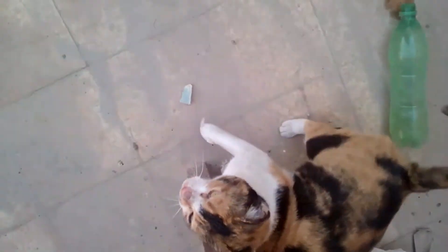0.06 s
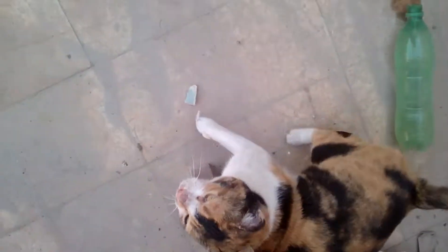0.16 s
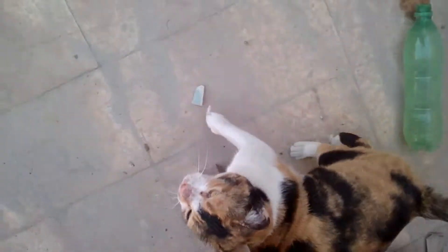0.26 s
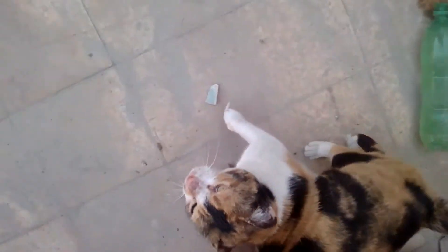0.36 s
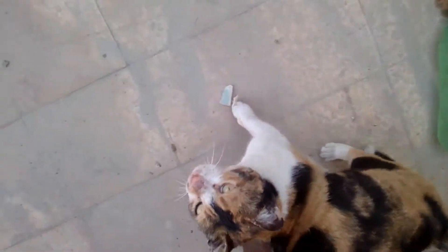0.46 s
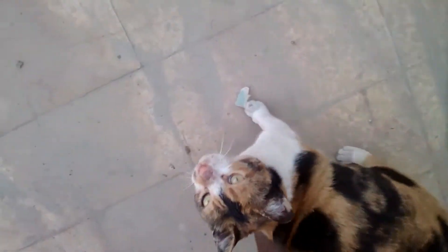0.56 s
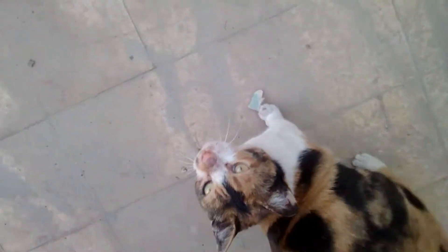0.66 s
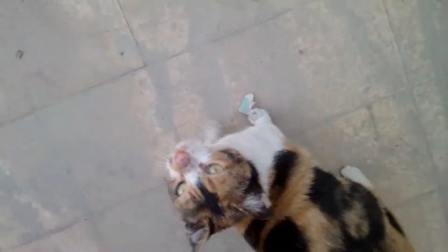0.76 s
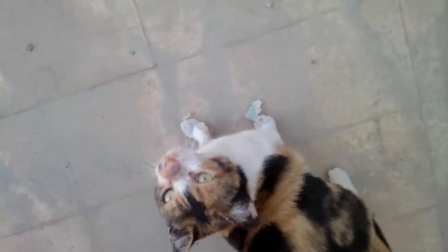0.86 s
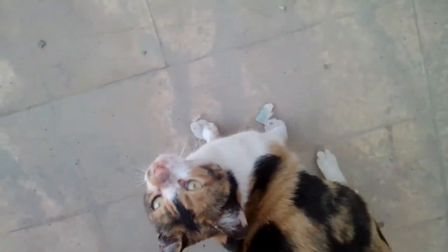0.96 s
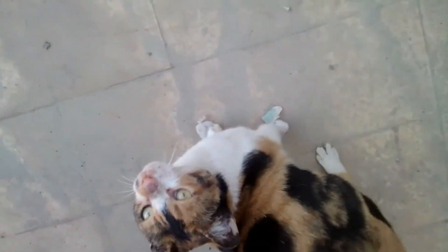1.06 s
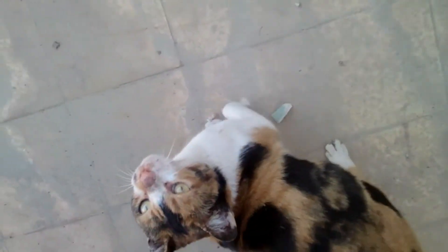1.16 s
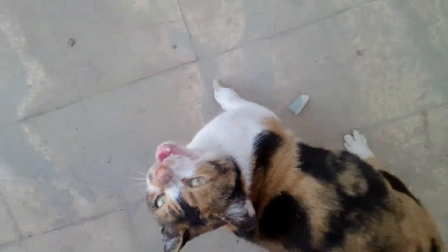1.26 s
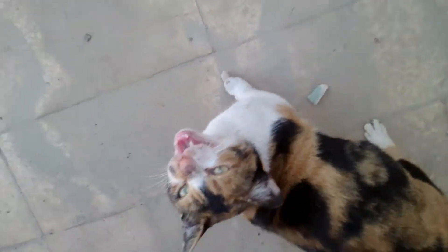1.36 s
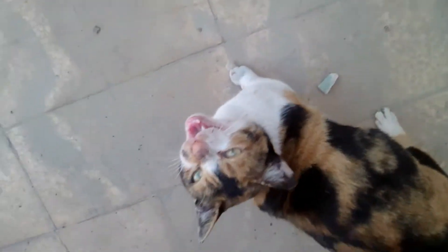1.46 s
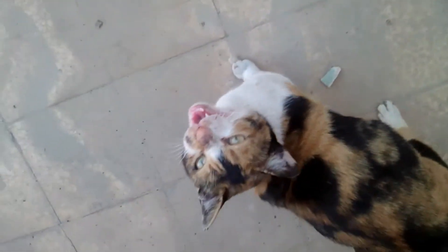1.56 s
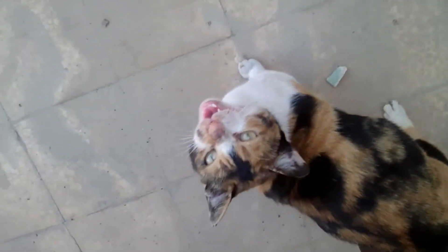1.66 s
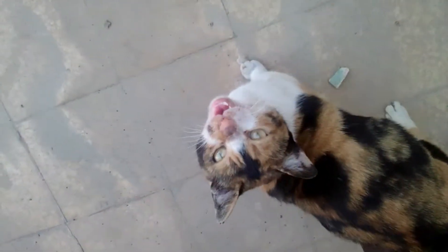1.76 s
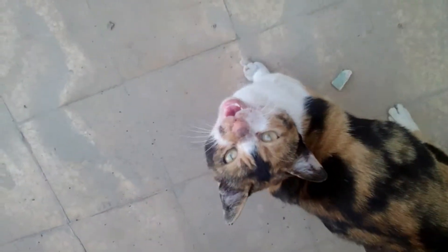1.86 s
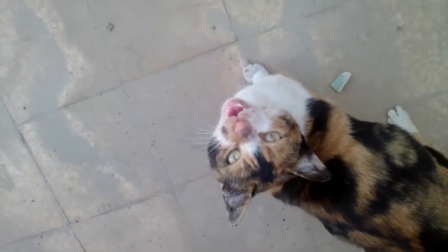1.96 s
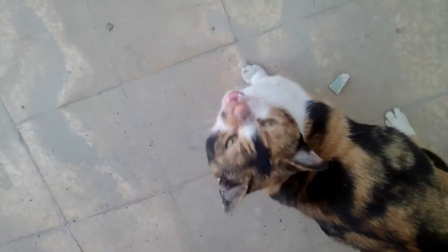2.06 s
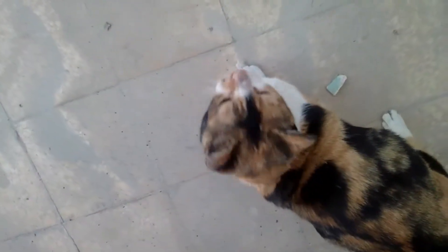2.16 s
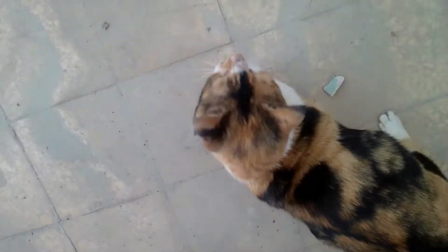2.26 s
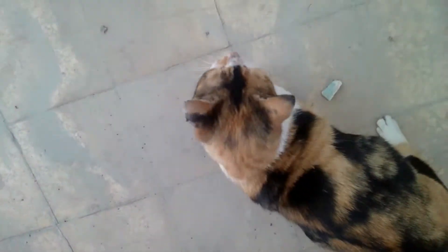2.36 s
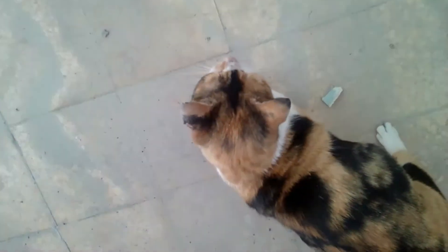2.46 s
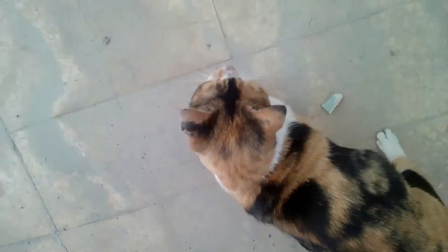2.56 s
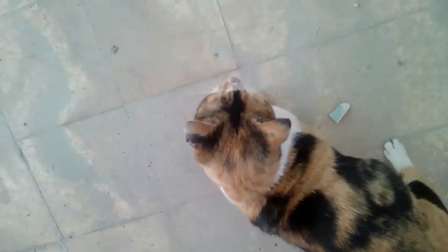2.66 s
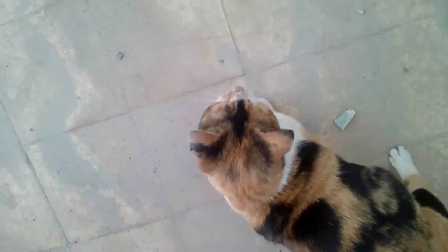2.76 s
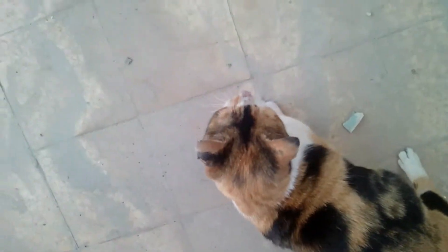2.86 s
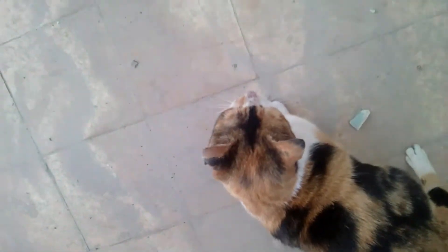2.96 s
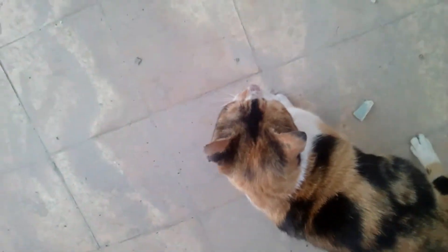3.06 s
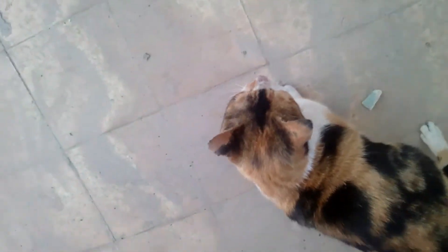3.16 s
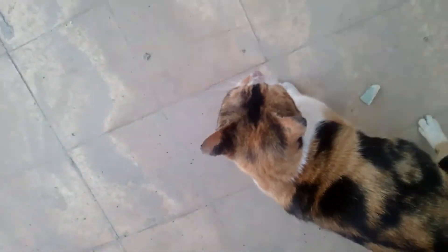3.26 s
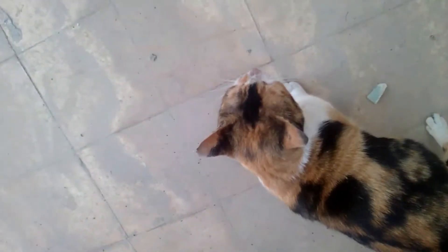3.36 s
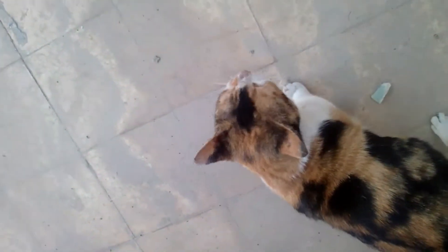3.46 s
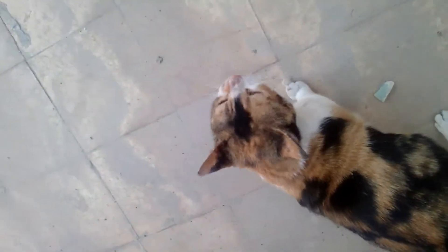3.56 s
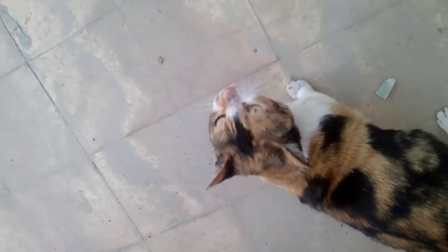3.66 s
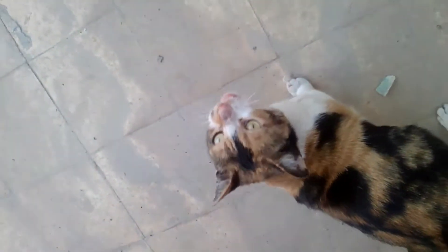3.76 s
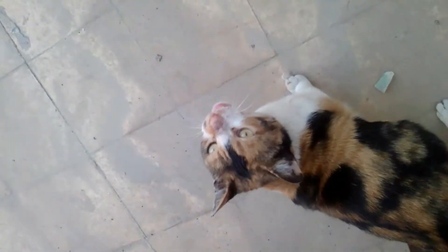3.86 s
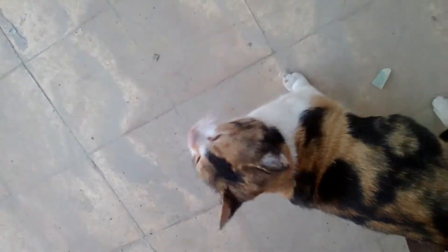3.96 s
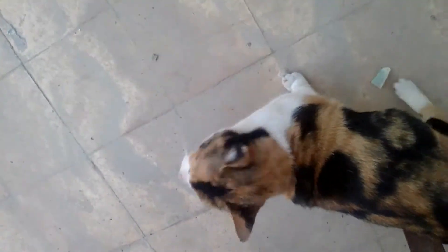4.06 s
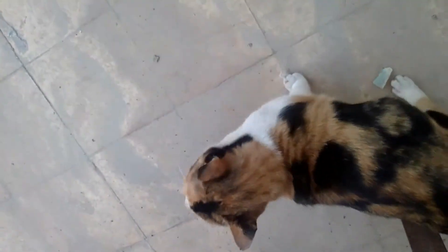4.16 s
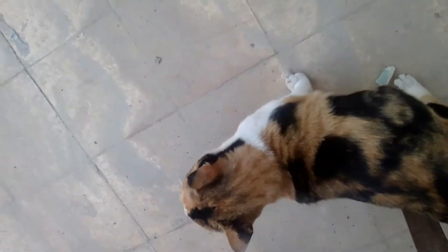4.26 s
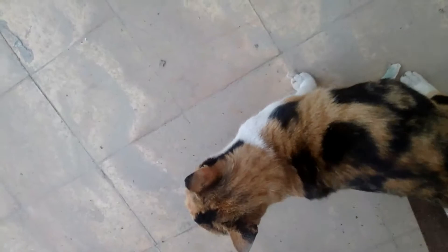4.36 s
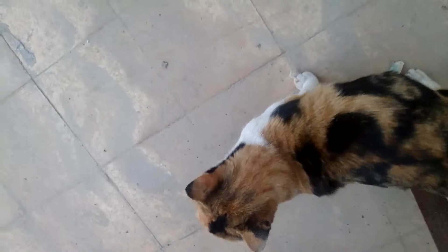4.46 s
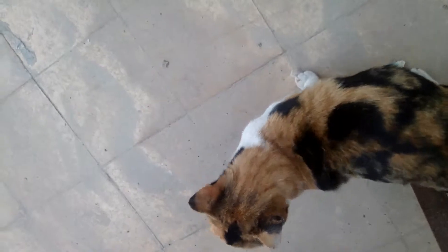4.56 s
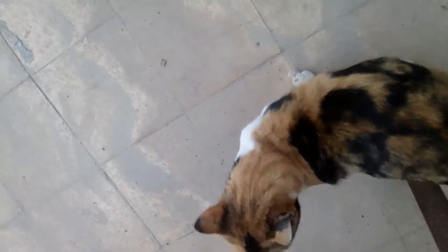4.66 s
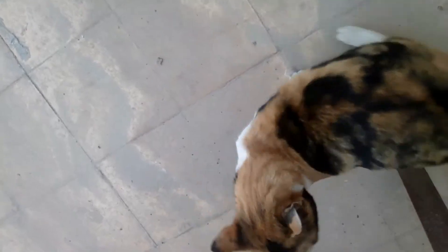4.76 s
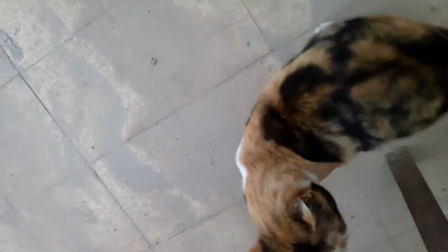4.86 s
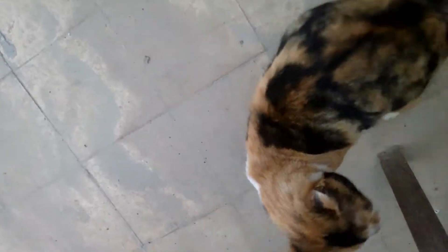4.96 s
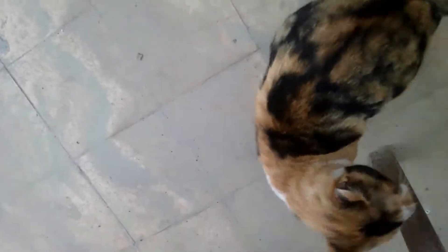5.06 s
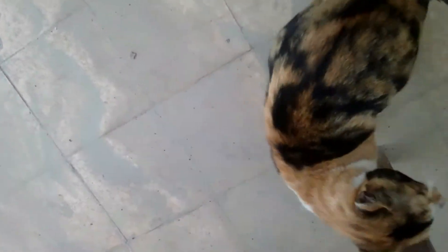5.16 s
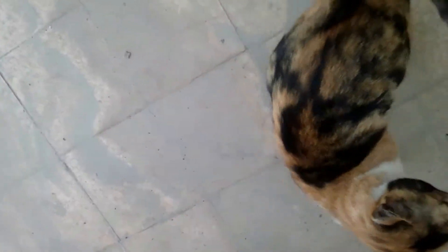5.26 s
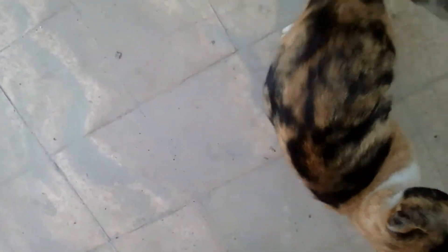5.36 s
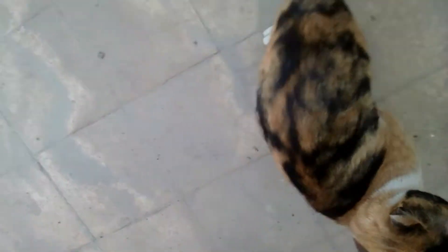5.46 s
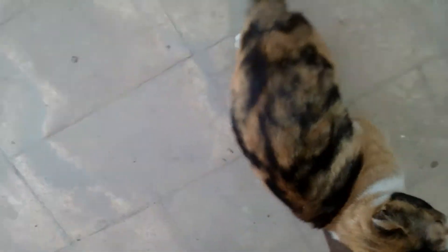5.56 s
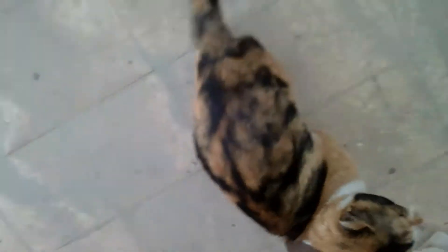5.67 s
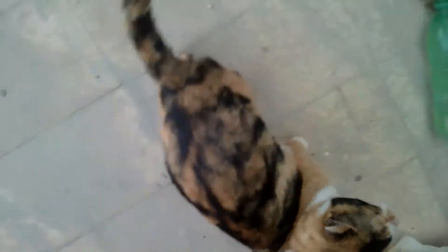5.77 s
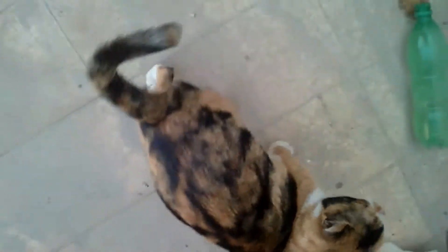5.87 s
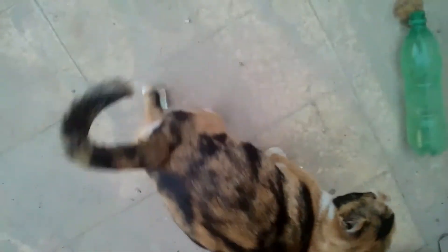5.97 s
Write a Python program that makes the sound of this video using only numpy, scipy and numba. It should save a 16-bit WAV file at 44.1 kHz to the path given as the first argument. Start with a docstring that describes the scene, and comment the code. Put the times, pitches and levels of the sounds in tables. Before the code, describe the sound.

Soft room noise with faint thin whistles and a short low purr leads to a loud cat meow, raspy at first, clear, then creaky. Lip smacks crackle before a second, shorter meow; a third is quieter and quick. Tiny puffs and squeaks follow. Close hand-held microphone, hard floor reflections, momentary dropouts.

```python
"""A cat meows three times on a tiled floor, about a metre below a hand-held recorder; it also purrs, sniffs and smacks.
Vocal folds pulse into moving throat resonances, at half rate as a call starts and creaking as it ends.
The purr is slow low pulses, the smacks short ringing noise bursts, the sniffs and faint squeaks swells of band noise.
Room rumble, hiss and thin whistles lie under it; the recorder mutes briefly four times and dips once."""
import sys
import numpy as np
from scipy import signal
from scipy.fft import rfft, irfft
from scipy.io import wavfile
from scipy.ndimage import uniform_filter1d
from numba import njit

SR = 44100
rng = np.random.default_rng(int(sys.argv[2]) if len(sys.argv) > 2 else 0)


def store_pcm(level_fs):
    """Save levels as 16-bit WAV."""
    pcm = np.round(np.clip(level_fs, -1, 1) * 32767).astype(np.int16)
    wavfile.write(sys.argv[1], SR, np.atleast_2d(pcm).T)


N = 264600
T = np.arange(N) / SR

# One curve per meow. Each row: time in seconds, pitch in Hz, level of the first, second and third ring
# and of the treble rings in dB, tilt of the treble in dB per octave.
MEOW_CURVES = [
    [(1.436, 525.6, -60, -56, -63, -52.5, 6), (1.456, 523.4, -58, -75, -36, -48.5, 4),
     (1.484, 570, -47.5, -49, -41.5, -39, 1), (1.528, 576, -48, -53, -42, -37.5, 0),
     (1.574, 562.6, -42.5, -52, -40.5, -44.5, 1), (1.646, 545.3, -41, -42, -48.5, -44.5, 2),
     (1.8, 536.8, -38.5, -41.5, -59, -42, -2), (1.864, 527.8, -41.5, -49, -54, -45, -0.5),
     (2.064, 534.2, -40, -47, -53, -45, -6), (2.162, 548, -37, -41.5, -53, -44, -8),
     (2.244, 545, -40.5, -44, -50, -44, -1.5), (2.292, 536.5, -43.5, -61, -51.5, -51.5, 2),
     (2.362, 530.8, -57, -59, -53.5, -49, -12), (2.41, 470.7, -53, -43, -60, -51.5, -7),
     (2.45, 501, -56.5, -60, -57.5, -55, 6), (2.52, 462, -81, -75, -63, -62.5, 10)],
    [(3.43, 492.7, -73, -64, -84, -71, 10), (3.478, 511.2, -62, -52, -52, -52, 11),
     (3.552, 531.3, -55, -50, -54, -48.5, 2), (3.654, 561.3, -54, -46, -45.5, -45, 0),
     (3.732, 565.4, -84, -41.5, -53, -46.5, -5.5), (3.848, 553, -46, -41, -58, -43.5, -11),
     (3.94, 541.5, -43, -44.5, -62, -46, 2.5), (4.028, 533.7, -44.5, -48, -54.5, -51, 4.5),
     (4.06, 515.5, -51, -54.5, -54.5, -54.5, 2), (4.132, 488.3, -55.5, -52, -73, -55.5, -1),
     (4.17, 504, -85, -95, -71, -64.5, 1)],
    [(4.93, 420, -77, -69, -90, -78, -2), (5.018, 478.6, -62, -60, -58, -53, -1),
     (5.064, 539, -56.5, -62.5, -46, -55.5, -2), (5.144, 560.7, -50, -55.5, -53.5, -53, -7),
     (5.208, 545.8, -55.5, -41, -81, -57, 3), (5.262, 542.4, -50, -44.5, -55, -56.5, -4),
     (5.32, 529, -61, -54.5, -64, -57.5, 0), (5.364, 533, -56, -54, -65, -62.5, -10),
     (5.42, 459.4, -98, -94, -74, -80, 3)],
]
# Each meow opens raspy, holds a clear note, tires and closes creaking. Each row: raspy from, clear from,
# settling time, tired from and creak from in seconds, strong-weak alternation (0-1) of the opening and of
# the tired note, roughness (0-1) of the same two, lag of the mouth's opening behind the voice in seconds.
MEOW_STAGES = [(1.48, 1.575, .04, 2.26, 2.365, .65, .3, .15, .22, .06),
               (3.61, 3.71, .06, 3.94, 4.08, .65, .06, .29, .16, .01),
               (5.02, 5.07, .04, 5.17, 5.33, .1, .04, .33, .15, .08)]
# Width of each throat resonance in Hz, per filter pass, from the lowest ring to the highest.
THROAT_WIDTHS_HZ = [205, 151, 304, 302, 424, 426, 797, 1270, 1570]
# Purr loudness curve. Each row: time in seconds, level in dB.
PURR_CURVE = [(0.94, -86), (1.02, -67), (1.1, -80), (1.18, -64.5), (1.26, -63.5), (1.33, -68.5),
              (1.36, -99)]
# Wet clicks of tongue and lips. Each row: start in seconds, peak in dB, ring in Hz, burst t60 in seconds.
SMACK_CLICKS = [(1.437, -36, 3000, 0.008), (2.837, -35.5, 5450, 0.033), (2.8426, -34, 5960, 0.035),
                (2.851, -36.5, 4910, 0.03), (2.8561, -24, 4350, 0.013), (2.865, -41, 5140, 0.0097),
                (2.867, -38, 4980, 0.011), (3.1747, -27.5, 5040, 0.0089), (3.1844, -35, 5030, 0.016),
                (3.218, -38.5, 4960, 0.016), (3.228, -41.5, 5030, 0.016), (3.442, -42, 1600, 0.015),
                (4.1203, -34, 3540, 0.012), (4.123, -31, 4810, 0.011), (4.9168, -46, 4448, 0.0085),
                (5.3554, -40, 3200, 0.015)]
# Mouth resonances in every smack. Each row: centre in Hz, width in Hz, level against the main ring in dB.
MOUTH_RINGS = [(1390, 800, -4.5), (2830, 380, -4.5), (6950, 980, -18)]
# Short puffs of air, from the nose or paws on tile, and three faint breathy squeaks near 2.7 kHz.
# Each row: centre time in seconds, length in seconds, centre in Hz, width in Hz, level at the height in dB.
BREATHY_SOUNDS = [(0.0, 0.18, 3700, 2400, -57), (0.792, 0.034, 4940, 890, -62),
                  (0.891, 0.033, 5420, 794, -60), (0.886, 0.041, 2840, 600, -63),
                  (1.362, 0.043, 5600, 700, -62), (1.383, 0.15, 4580, 400, -64.5),
                  (2.761, 0.3, 4700, 1500, -65), (3.705, 0.093, 8460, 596, -64),
                  (4.219, 0.055, 4900, 1199, -59.5), (4.311, 0.059, 4340, 1500, -57.5),
                  (4.509, .15, 4440, 810, -68.5), (5.508, 0.052, 2780, 200, -70),
                  (5.726, 0.1, 2610, 220, -61.5), (5.845, 0.23, 2680, 300, -64.5),
                  (5.813, 0.025, 4200, 2540, -57), (5.825, 0.042, 4980, 600, -58),
                  (5.944, 0.052, 4930, 1800, -59), (5.953, 0.047, 3220, 394, -59)]
# Brief thin whistles. Each row: start in seconds, end in seconds, pitch in Hz, pitch wander in Hz,
# amplitude in dB.
BRIEF_WHISTLES = [(.45, .62, 3661, 10, -63), (.64, .81, 3661, 10, -64), (.47, .65, 3330, 10, -65),
                  (.68, .82, 3330, 10, -67), (.55, .9, 2330, 20, -75)]
# Whistles always there. Each row: centre in Hz, width in Hz, level in dB.
STEADY_WHISTLES = [(1866, 31, -77), (1618, 29, -83.5), (10850, 180, -87.5)]
# Shape of the room's spectrum. Each row: frequency in Hz, relative density in dB per Hz.
ROOM_SHAPE = [(15, -48), (25, -41), (79, -3.5), (227, 0.5), (349, -7), (598, -5.5), (666, -28), (804, -1),
              (945, -10.5), (1450, -14), (1800, -11), (2010, -17), (4620, -10.5), (6380, -20.5),
              (15500, -20.5)]
# Bass swells. Each row: centre time in seconds, length in seconds, rise in dB.
BASS_SWELLS = [(2.202, 2.27, 4), (2.43, 0.17, 8.5), (3.096, 0.29, 4), (3.828, 1, 3), (5.197, 0.49, 3.5),
               (5.85, .3, 3)]
# Brief level drops. Each row: start of the hold in seconds, depth in dB.
LEVEL_DROPS = [(0.299, -34), (2.874, -8), (4.799, -34.5), (5.541, -34.5), (5.984, -26)]

FIRST_HZ, SECOND_HZ, NOSE_HZ, PALATE_HZ, LIP_HZ, MOUTH_EDGE_HZ = 1095, 1686, 844, 3135, 6415, 9260
BOUNCE_GAIN, BOUNCE_S, BOUNCE_DRIFT_S = .3, .0009, .00006

# Alternation and roughness of the folds, 0-1.
ONSET_HALVES, ONSET_ROUGH = .35, .38  # as the folds first catch
HELD_HALVES, HELD_ROUGH = .02, .04
CREAK_HALVES, CREAK_ROUGH, CHANGE_S = .5, .5, .02

# Throat settings by stage: opening, held, closing.
THIRD_HZ, FOURTH_HZ, TOP_RING_HZ = (2140, 2695, 2590), (3890, 4027, 4150), (4740, 5340, 5100)
CHEST_DB = (-64.5, -58, -55.5)  # at full effort
NOSE_RE_EFFORT_DB = (-11.5, -40, -8.5)
PALATE_RE_TREBLE_DB, FOURTH_RE_TREBLE_DB = (-5, -2.5, 0.5), (0, 0.5, -5.5)
TOP_RE_TREBLE_DB, LIP_RE_TREBLE_DB = (-2.5, -4.5, 1.5), (-10, -5, -28)
FULL_EFFORT_DB, CHEST_FOLLOWS = -38, 0.32  # the chest follows this share of the effort's dB
PATCHY_DB, PATCHY_PER_S = 1.8, 14  # each treble ring wavers on its own

PURR_PULSE_S, PURR_PULSES_PER_S = 0.84, 28.93  # one pulse falls at PURR_PULSE_S
TILES_T60_S, TILES_DB, TILES_GAP_S = 0.15, -9.5, 0.0053
ROOM_DB = -59.5
DROP_FALL_S, DROP_HOLD_S, DROP_BACK_S, TOP_HZ = 0.0068, 0.056, 0.031, 15500


def undb(db):
    """Amplitude factor of a level in dB."""
    return 10 ** (np.asarray(db) / 20)


def level(x, db):
    """Scale to an rms level in dB."""
    return x * undb(db) / np.sqrt(np.mean(x ** 2))


@njit
def svf(x, hz, width):
    """State-variable band-pass with a moving centre, gain 1 there."""
    y, band_state, low_state = np.empty(len(x)), 0., 0.
    for i in range(len(x)):
        g, k = np.tan(np.pi * hz[i] / SR), width / hz[i]
        v = (band_state + g * (x[i] - low_state)) / (1 + g * (g + k))
        band_state = 2 * v - band_state
        low_state += 2 * g * v
        y[i] = k * v
    return y


def ring_twice(x, hz, width_hz):
    """Two equal band-passes in series; the centre may move."""
    centre_hz = hz + np.zeros(len(x))
    return svf(svf(x, centre_hz, float(width_hz)), centre_hz, float(width_hz))


def hiss(hz, width_hz, size):
    """Noise in one band, rms 1."""
    return level(ring_twice(rng.standard_normal(size), hz, width_hz), 0)


def walk(per_s, size=N):
    """Random levels held 1 / per_s seconds and slewed twice; spread near 1."""
    hold = max(int(SR / per_s), 1)
    steps = np.repeat(rng.standard_normal(size // hold + 1), hold)
    return 1.278 * uniform_filter1d(uniform_filter1d(steps, hold), hold)[:size]


def add(out, start_s, x):
    """Mix x into out from start_s."""
    i = int(start_s * SR)
    out[i:i + len(x)] += x[:N - i]


def fold_pulses(t, hz, halves, rough):
    """Vocal folds: pulses of alternating strength give way to puffs of noise where rough."""
    size = len(t)
    jitter = (0.0036 + 0.125 * rough ** 2) * walk(180, size)
    pair_phase = np.pi * np.cumsum(hz * (1 + jitter)) / SR
    # alternate strong and weak pulses put lines half way between the harmonics
    pulses = sum((halves if k % 2 else 1) * np.cos(k * pair_phase) for k in range(1, 33)) / 4
    pulses = pulses * undb((-1.0 + 5.8 * rough) * walk(120, size))
    puffs = (1 + np.cos(2 * pair_phase)) * rng.standard_normal(size)
    source = np.sqrt(np.clip(1 - 1.3 * rough, 0, 1)) * pulses + 1.16 * (0.0066 + rough) * puffs
    return signal.sosfilt(signal.butter(8, MOUTH_EDGE_HZ, fs=SR, output="sos"), source)


def tile_bounce(source):
    """The tiles send up a second copy whose delay drifts."""
    i = np.arange(len(source))
    lag = SR * (BOUNCE_S + BOUNCE_DRIFT_S * walk(6.23, len(source)))
    return source + BOUNCE_GAIN * np.interp(i - lag, i, source)


def meow(rows, raspy_s, clear_s, settle_s, tired_s, creak_s, rasp_halves, tired_halves,
         rasp_rough, tired_rough, mouth_lag_s):
    """Fold pulses ring nine resonances that change with the stage of the call."""
    s, *columns = np.transpose(rows)
    t = np.arange(s[0], s[-1], 1 / SR)
    hz, first_db, second_db, third_db, treble_db, tilt_db = (np.interp(t, s, c) for c in columns)

    settle_from_s, creak_full_s = clear_s - settle_s, creak_s + CHANGE_S
    times = s[0], raspy_s, settle_from_s, clear_s, tired_s, tired_s + CHANGE_S, creak_s, creak_full_s
    halves = np.interp(t, times, (ONSET_HALVES, rasp_halves, rasp_halves, HELD_HALVES, HELD_HALVES,
                                  tired_halves, tired_halves, CREAK_HALVES))
    rough = np.interp(t, times, (ONSET_ROUGH, rasp_rough, rasp_rough, HELD_ROUGH, HELD_ROUGH,
                                 tired_rough, tired_rough, CREAK_ROUGH))
    source = tile_bounce(fold_pulses(t, hz, halves, rough))

    def staged(values, lag_s=0):
        opening, held, closing = values
        stage_times = settle_from_s + lag_s, clear_s + lag_s, creak_s, creak_full_s
        return np.interp(t, stage_times, (opening, held, held, closing))

    fourth_hz, top_hz = staged(FOURTH_HZ), staged(TOP_RING_HZ)

    def treble(offset_db, ring_hz):
        tilted_db = tilt_db * np.log2(ring_hz / fourth_hz)
        return treble_db + staged(offset_db) + tilted_db + PATCHY_DB * walk(PATCHY_PER_S, len(t))

    effort_db = 10 * np.log10(undb(2 * first_db) + undb(2 * second_db) + undb(2 * treble_db))
    chest_db = staged(CHEST_DB) + CHEST_FOLLOWS * (effort_db - FULL_EFFORT_DB)
    fourth_db = treble(FOURTH_RE_TREBLE_DB, fourth_hz)
    rings = [(hz, chest_db),  # the chest ring follows the pitch
             (NOSE_HZ, effort_db + staged(NOSE_RE_EFFORT_DB)),
             (FIRST_HZ, first_db),
             (SECOND_HZ, second_db),
             (staged(THIRD_HZ, mouth_lag_s), third_db),
             (PALATE_HZ, treble(PALATE_RE_TREBLE_DB, PALATE_HZ)),
             (fourth_hz, fourth_db),
             (top_hz, treble(TOP_RE_TREBLE_DB, top_hz)),
             (LIP_HZ, treble(LIP_RE_TREBLE_DB, LIP_HZ))]
    out = undb(fourth_db - 26) * rng.standard_normal(len(t))  # breath
    for k, ((ring_hz, ring_db), width_hz) in enumerate(zip(rings, THROAT_WIDTHS_HZ)):
        ring = ring_twice(source, ring_hz, width_hz)
        # effort sets the loudness of each ring, wherever the harmonics fall
        ring = ring / np.sqrt(uniform_filter1d(ring ** 2, size=1500) + 1e-9)
        out = out + (-1) ** k * undb(ring_db) * ring  # opposite signs fill the gap between neighbours
    return out * np.clip(np.minimum(t - s[0], s[-1] - t) / .002, 0, 1)


def purr():
    """Slow pulses ring a low throat resonance."""
    beats = np.diff(np.floor((T - PURR_PULSE_S) * PURR_PULSES_PER_S), prepend=0) > 0
    thump = level(ring_twice(beats * 1., 460, 250), 0)
    s, db = np.transpose(PURR_CURVE)
    return thump * undb(np.interp(T, s, db)) * (T > s[0]) * (T < s[-1])


def smacks():
    """Tongue and lips: a decaying noise burst rings the mouth resonances."""
    out, t = np.zeros(N), T[:1500]
    for start_s, peak_db, hz, t60_s in SMACK_CLICKS:
        burst = rng.standard_normal(len(t)) * np.exp(-np.log(1000) * t / t60_s)
        rings = [(hz, 2000, 0)] + MOUTH_RINGS
        click = sum(undb(db) * ring_twice(burst, f, width_hz) for f, width_hz, db in rings)
        add(out, start_s, undb(peak_db) * click / np.abs(click).max())
    return out


def sniffs_and_squeaks():
    """Puffs and breathy squeaks: band noise that flutters under a bell-shaped swell."""
    out = np.zeros(N)
    for centre_s, length_s, hz, width_hz, db in BREATHY_SOUNDS:
        t = T[max(int((centre_s - .3) * SR), 0):int((centre_s + .3) * SR)]
        noise = hiss(hz, width_hz, len(t)) * undb(2.5 * walk(60, len(t)))
        add(out, t[0], undb(db) * noise * np.exp(-(2 * (t - centre_s) / length_s) ** 2))
    return out


def tile_echo(cat):
    """Hard room: decaying noise as the impulse response, after a short gap."""
    t = T[:SR // 2]
    tail = rng.standard_normal(len(t)) * np.exp(-np.log(1000) * t / TILES_T60_S) * (t > TILES_GAP_S)
    return signal.fftconvolve(cat, level(tail, TILES_DB) / np.sqrt(len(t)))[:N]


def whistles():
    """Steady ones are narrow noise bands, brief ones sines that waver in pitch and level."""
    out = sum(undb(db) * hiss(hz, width_hz, N) for hz, width_hz, db in STEADY_WHISTLES)
    for start_s, end_s, hz, wander_hz, db in BRIEF_WHISTLES:
        size = int((end_s - start_s) * SR)
        tone = np.sin(2 * np.pi * np.cumsum(hz + wander_hz * walk(93, size)) / SR)
        fade = signal.windows.tukey(size, .25)
        add(out, start_s, undb(db + 1.5 * walk(25, size)) * tone * fade)
    return out


def slice_of_noise(hz):
    """Noise in a third-octave slice, rms 1; neighbours overlap to an even sum."""
    thirds = 3 * np.log2(np.fft.rfftfreq(N, 1 / SR) / hz + 1e-9)
    weight = np.cos(np.clip(thirds, -1, 1) * np.pi / 2)
    return level(irfft(rfft(rng.standard_normal(N)) * weight, N), 0)


def room():
    """Rumble and hiss: third-octave bands that flicker; the bass swells on its own."""
    out, (shape_hz, shape_db) = 0, np.transpose(ROOM_SHAPE)
    swell_db = sum(db * np.exp(-(2 * (T - s) / length_s) ** 2) for s, length_s, db in BASS_SWELLS)
    for hz in 30 * 2 ** (np.arange(28) / 3):
        # the log term turns density into band level
        band_db = np.interp(np.log(hz), np.log(shape_hz), shape_db) + 10 * np.log10(hz)
        swell_share = np.exp(-np.log(hz / 190) ** 2 / 3.7)  # full at 190 Hz
        out = out + undb(band_db + swell_share * swell_db + 2.06 * walk(9)) * slice_of_noise(hz)
    return level(out, ROOM_DB)


def scene():
    """The cat and its echo over whistles and room."""
    cat = purr() + smacks() + sniffs_and_squeaks()
    for rows, stages in zip(MEOW_CURVES, MEOW_STAGES):
        add(cat, rows[0][0], meow(rows, *stages))
    return (cat + tile_echo(cat) + whistles() + room())[None]


def record(dry):
    """Brief level drops, a fast jump and slow creep back, then the cut at the top."""
    db = 0
    for start_s, depth_db in LEVEL_DROPS:
        after_s = T - start_s - DROP_HOLD_S
        creep = 0.66 * np.exp(-np.maximum(after_s, 0) / DROP_BACK_S)
        back = np.where(T < start_s + DROP_HOLD_S, 1, creep)
        db = db + depth_db * back * np.clip((T - start_s) / DROP_FALL_S + 1, 0, 1)
    return signal.sosfilt(signal.ellip(10, .2, 60, TOP_HZ, fs=SR, output="sos"), dry * undb(db))


dry = scene()
out = record(dry)
store_pcm(out)
```